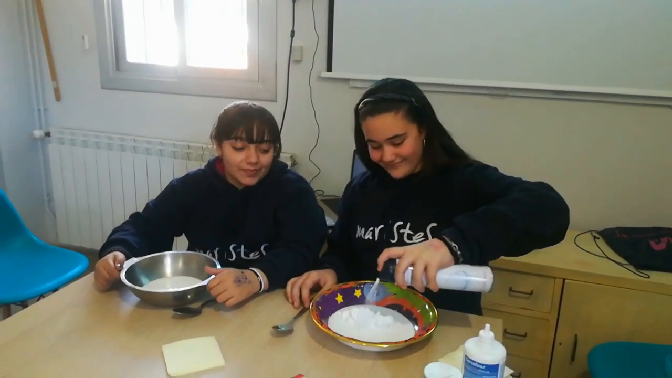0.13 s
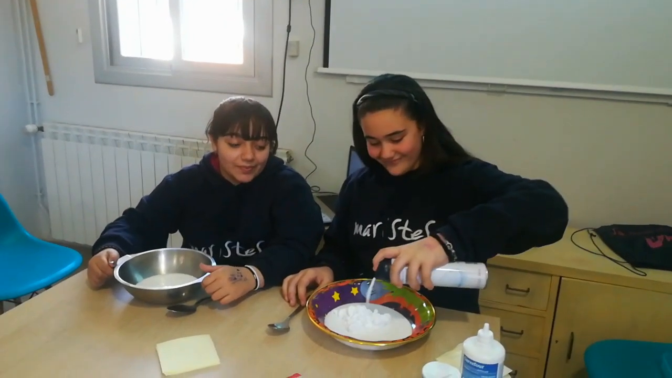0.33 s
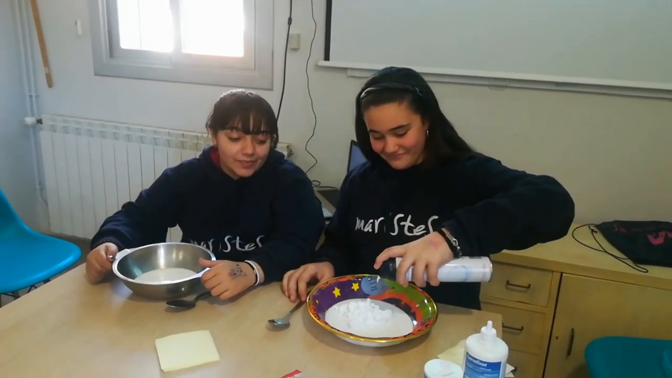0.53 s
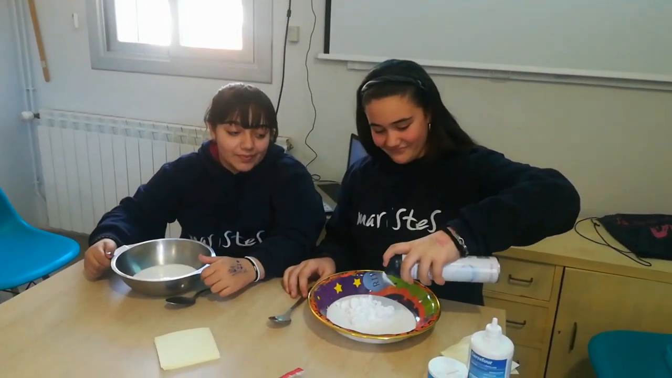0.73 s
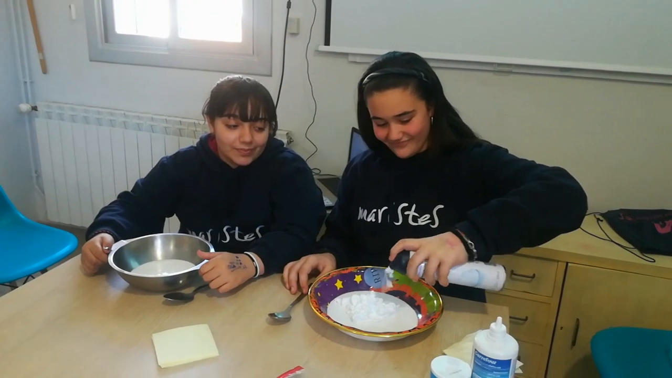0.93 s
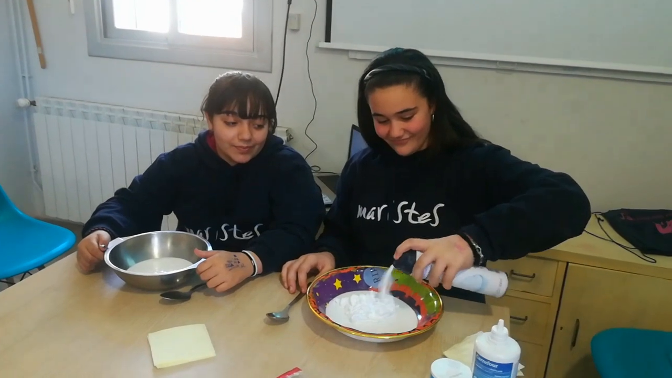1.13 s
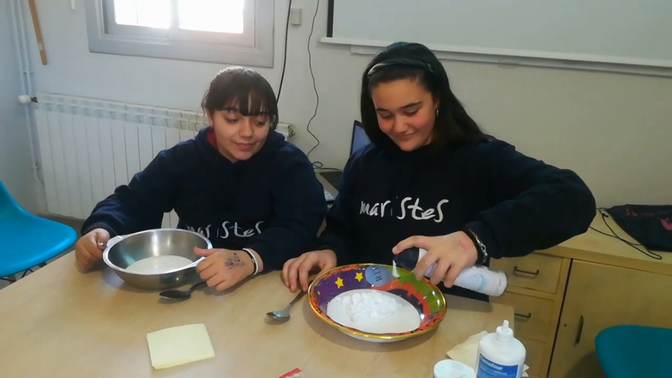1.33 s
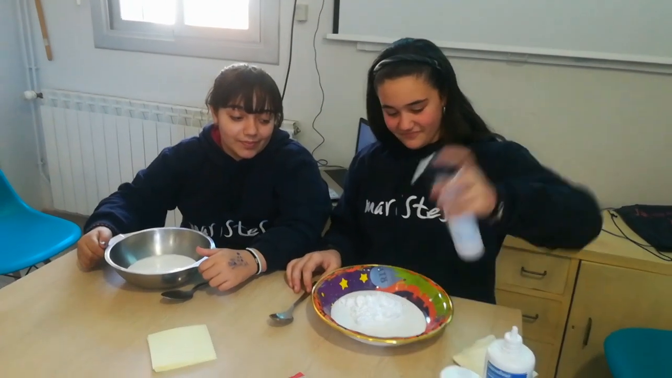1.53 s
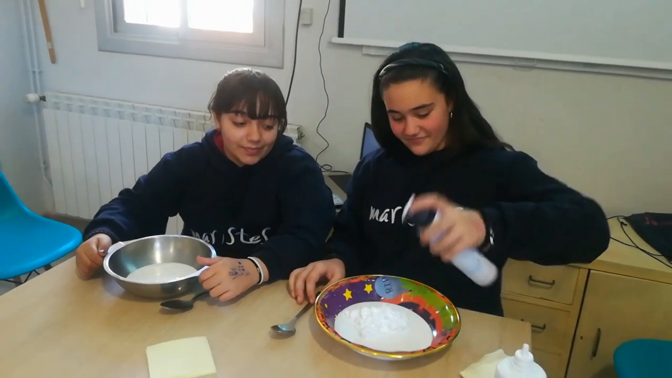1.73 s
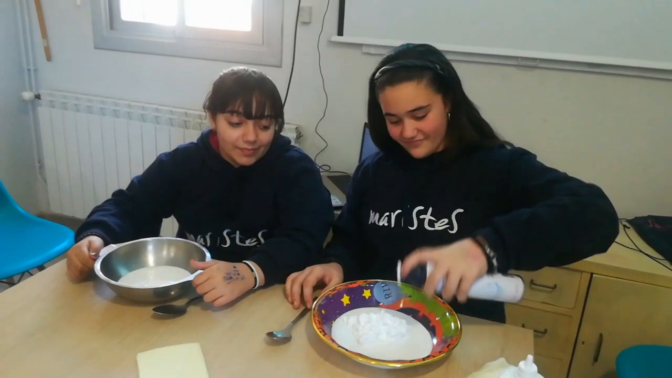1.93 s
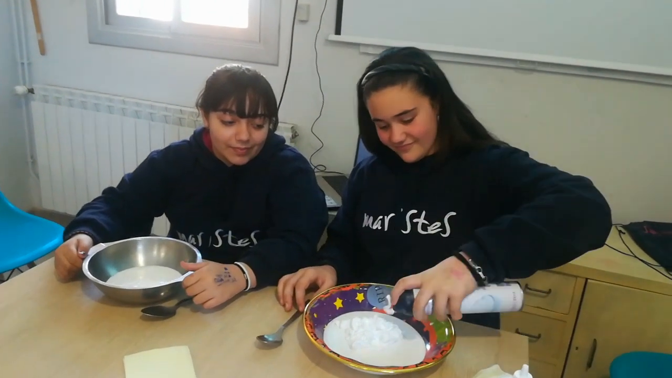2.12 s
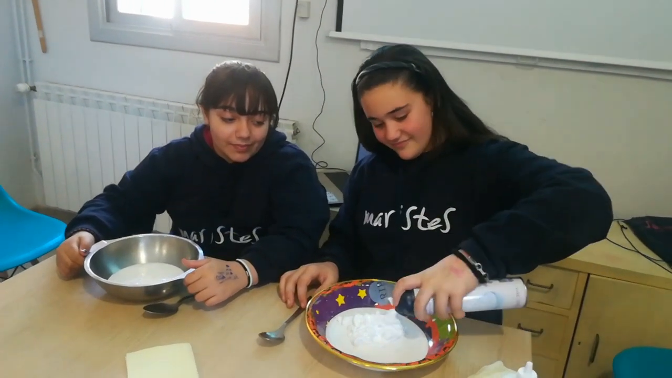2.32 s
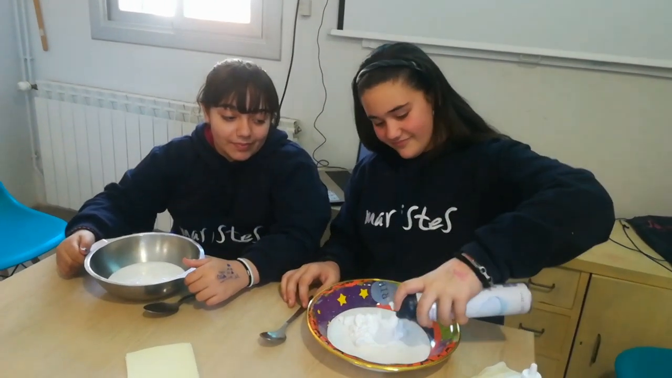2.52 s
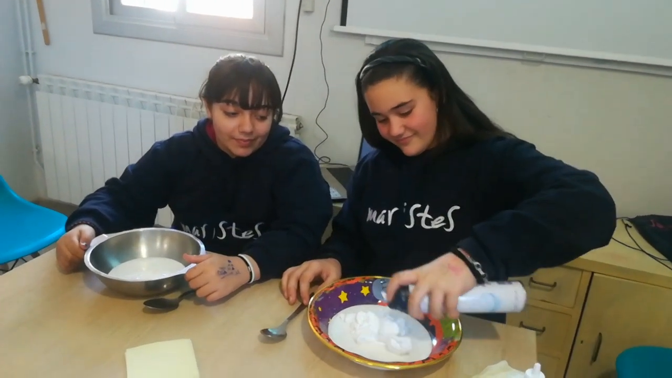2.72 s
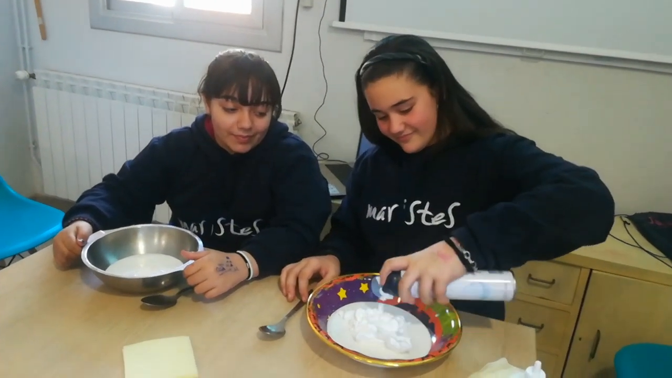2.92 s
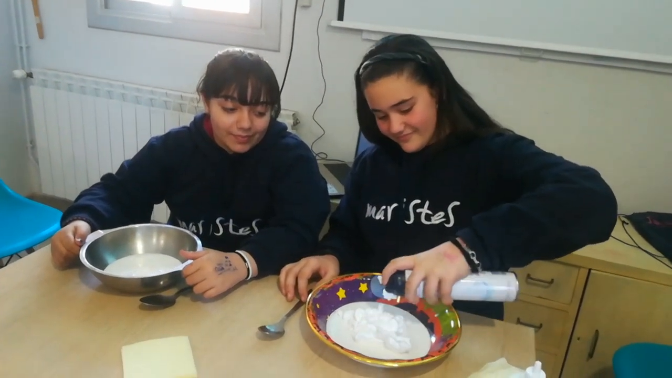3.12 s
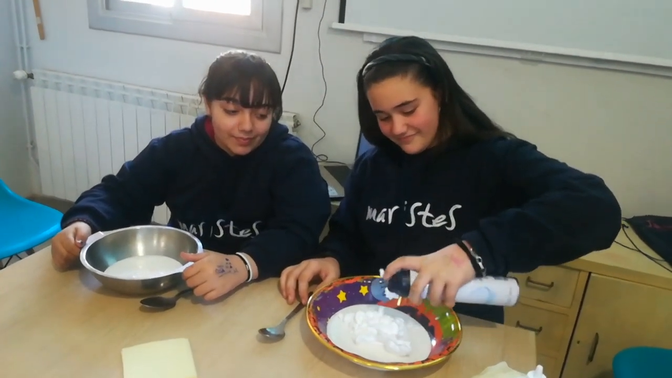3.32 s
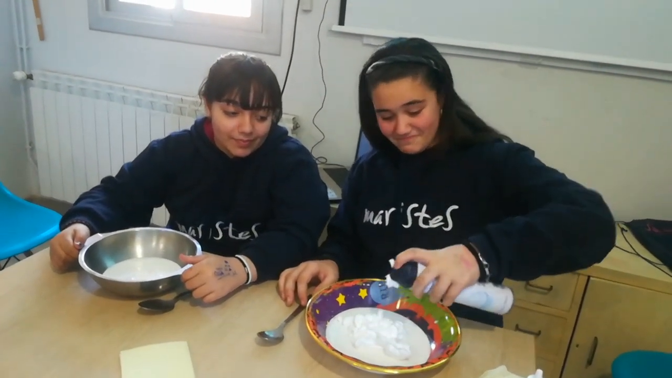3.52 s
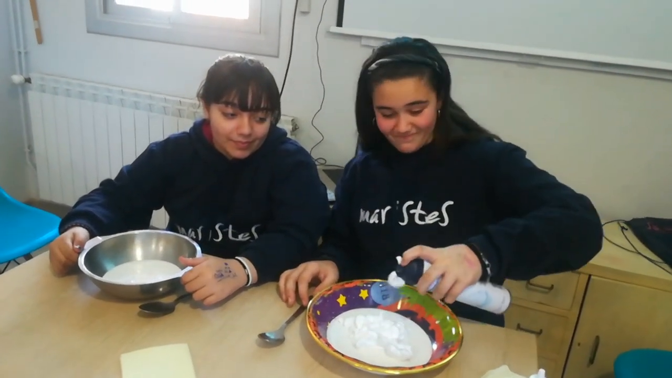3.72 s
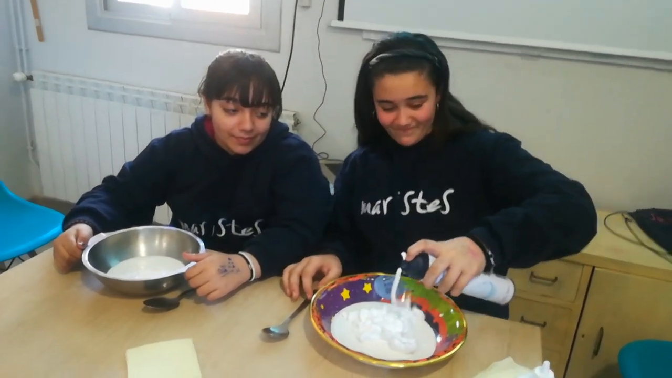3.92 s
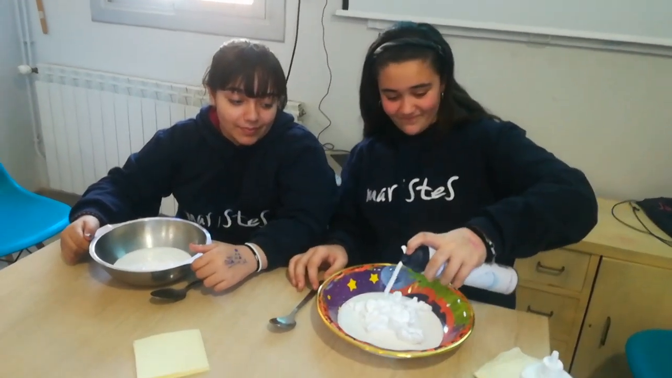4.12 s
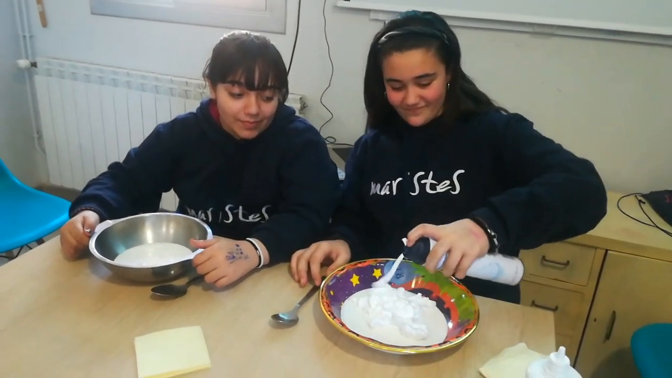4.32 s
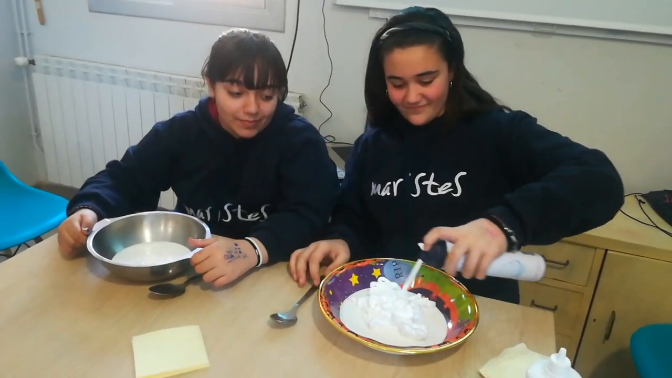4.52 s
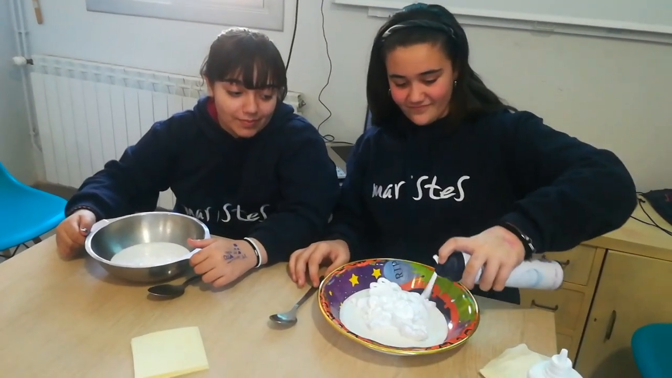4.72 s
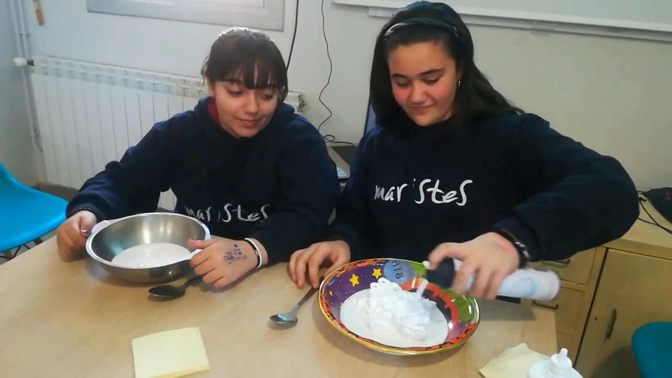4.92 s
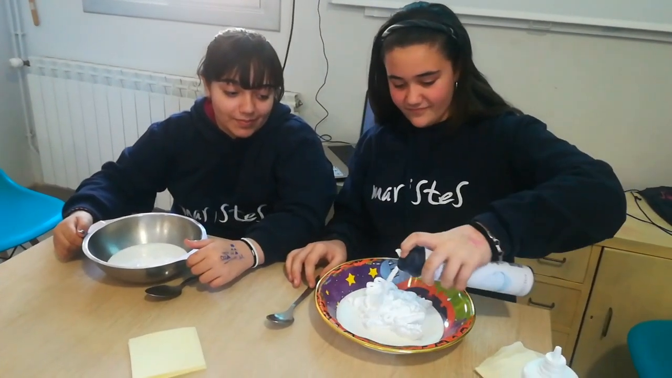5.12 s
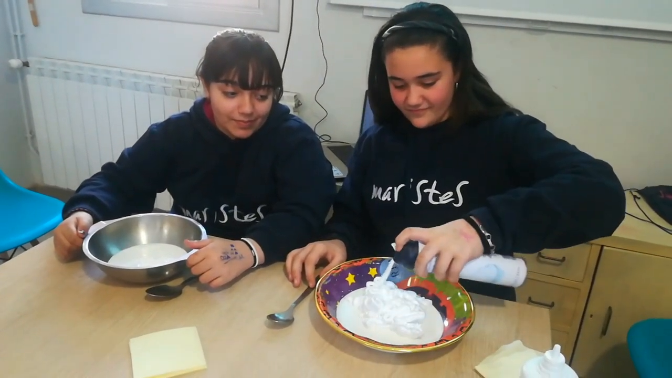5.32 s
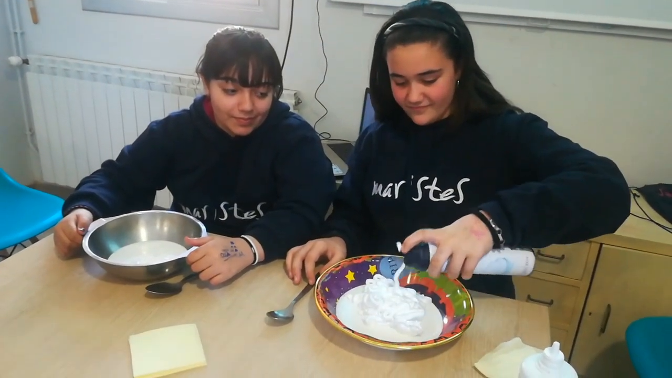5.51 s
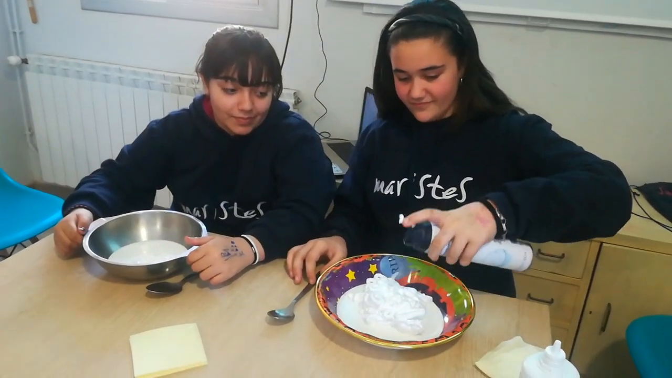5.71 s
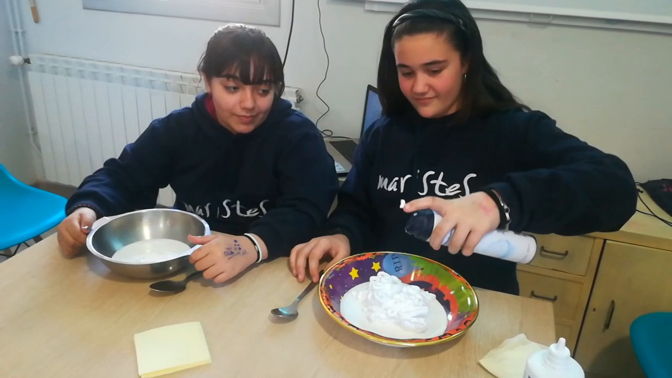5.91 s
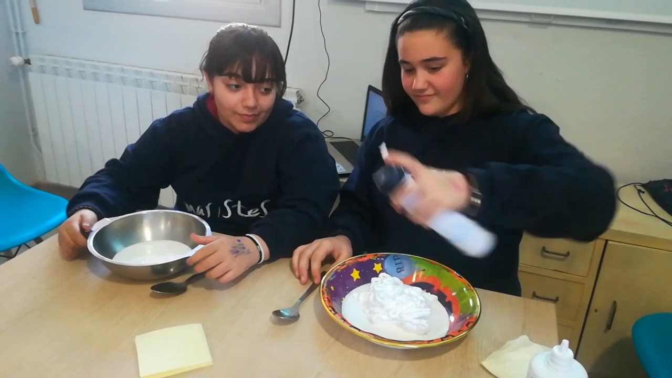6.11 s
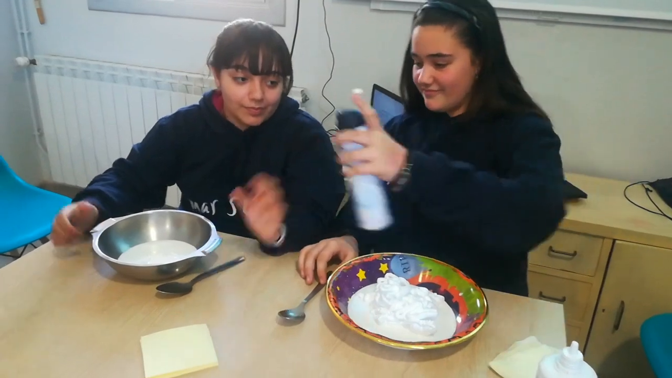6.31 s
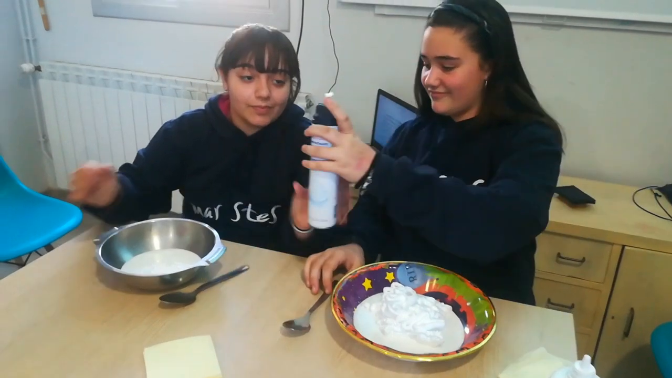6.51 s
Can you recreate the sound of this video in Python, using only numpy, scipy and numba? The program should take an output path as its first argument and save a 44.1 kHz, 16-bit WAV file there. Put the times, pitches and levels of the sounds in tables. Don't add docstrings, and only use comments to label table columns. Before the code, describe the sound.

An aerosol can sprays foam in short hissing, spitting bursts in a quiet hard-walled room, then a wooden table gets knocked.

```python
import sys
import numpy as np
from scipy import signal
from scipy.fft import rfft, irfft, next_fast_len
from scipy.io import wavfile
from scipy.ndimage import uniform_filter1d, map_coordinates
from numba import njit

SR = 44100
rng = np.random.default_rng(int(sys.argv[2]) if len(sys.argv) > 2 else 0)


def linear_from_db(decibels):
    return 10 ** (np.asarray(decibels, float) / 20)


def dump_mix(stems):
    frames = np.atleast_2d(stems).T
    limited = np.clip(frames, -1, 1)
    pcm = np.round(limited * 32767).astype(np.int16)
    wavfile.write(sys.argv[1], SR, pcm)


N = 289281

# pitch_hz, level_db
JET_COLOUR = [(1200, -19.5), (1900, -7), (2450, -2.5), (3100, 0), (4200, 0), (5200, -4.5), (6600, -2.5),
              (7800, -5), (9500, -21)]
# pitch_hz, level_db
GURGLE_COLOUR = [(120, -11.5), (250, -4.5), (600, -4), (1200, -1.5), (1900, -0.5), (2600, -20.5)]
# pitch_hz, level_db
AIR_COLOUR = [(6500, -19), (8000, 0.5), (10000, -3.5), (13000, -9.5), (16000, -17)]
# pitch_hz, level_db, fade_by_60_db_s
TABLE_NOTES = [(163, -2.5, 0.52), (269.6, -5, 0.78), (336, 0, 0.44), (364, -5.5, 0.65), (400, -28, 0.35),
               (519, -14, 0.14)]


def unit(x):
    return x / np.sqrt(np.mean(x ** 2, axis=-1, keepdims=True))


def colour(x, points):
    hz, db = np.transpose(points)
    size = next_fast_len(x.shape[-1])
    bins_hz = np.arange(1, size // 2 + 2) * SR / size
    gain_db = np.interp(np.log(bins_hz), np.log(hz), db)
    return irfft(rfft(x, size) * linear_from_db(gain_db), size)[..., :x.shape[-1]]


def hiss(points):
    return unit(colour(rng.standard_normal(N), points))


def walk(rate_hz):
    hold = int(SR / rate_hz)
    steps = np.repeat(rng.standard_normal(N // hold + 1), hold)
    smooth = uniform_filter1d(uniform_filter1d(steps, hold), hold)
    return 1.27 * smooth[:N]


@njit
def svf(x, hz, width):
    y, band, low = np.empty(len(x)), 0., 0.
    for i in range(len(x)):
        g = np.tan(np.pi * hz[i] / SR)
        k = width / hz[i]
        v = (band + g * (x[i] - low)) / (1 + g * (g + k))
        low = low + 2 * g * v
        band = 2 * v - band
        y[i] = k * v
    return y


def throat(gas, hz, width_hz):
    return unit(svf(svf(gas, hz, width_hz), hz, width_hz))


def gesture(rows, swell_s, swell_db, bend, open_s, shut_s):
    start_s, length_s, level_db, sag_db = np.transpose(rows)[:4, :, None]
    since = np.arange(N) / SR - start_s
    rising = np.clip(1 - since / swell_s, 0, 1)
    late = np.clip((since - swell_s) / np.maximum(length_s - swell_s, .01), 0, 1)
    gate = np.clip(np.minimum(since / open_s, (length_s - since) / shut_s + 1), 0, 1)
    level = linear_from_db(level_db - swell_db * rising ** 2 - sag_db * late ** bend)
    return (gate * level) ** 2, np.clip(since / length_s, 0, 1)


def valve():
    # start_s, length_s, level_db, sag_db, throat_hz
    presses = [
        (-0.09, 0.2, -26, 17, 5620),
        (0.245, 0.2, -26, 12.5, 5600),
        (0.733, 0.46, -27.5, 19.5, 5850),
        (2.592, 0.48, -28, 0.5, 5600),
        (3.645, 0.21, -32.5, 20.5, 5250),
    ]
    # start_s, length_s, level_db, sag_db, throat_hz
    easings = [
        (1.3, 0.25, -60.5, 31, 7400),
        (2.16, 0.54, -45, 9.5, 5900),
        (0.62, 0.1, -52.5, 0.1, 6400),
    ]
    # start_s, length_s, level_db, sag_db, throat_hz
    dribbles = [(0.11, 0.29, -42, 4.5, 5350), (3.25, 0.37, -61, 14.5, 5600),
                (3.619, 0.015, -59.5, -4, 5100), (3.84, 0.2, -43.5, 1, 5350), (4.04, 0.23, -46, 11, 5600),
                (4.228, 0.1, -53, 3, 5600), (4.3, 0.98, -56.5, 3.5, 5950), (5.215, 0.25, -56, 2.5, 6900),
                (5.705, 0.18, -44.5, 21.5, 5580), (5.958, 0.16, -57, 18.5, 6450),
                (6.48, 0.051, -62.5, 11, 6870), (6.53, 0.05, -59.5, 3, 6870)]
    kinds = [(presses, 0.075, 4, 2.62), (easings, 0.23, 26, 0.57), (dribbles, 0.008, -3, 1.1)]
    power, pitch = 1e-12, 1e-12 * 5800
    for rows, swell_s, swell_db, bend in kinds:
        p, through = gesture(rows, swell_s, swell_db, bend, open_s=0.0022, shut_s=0.016)
        hz = np.array(rows)[:, -1:] * (1 - 0.05 * (through - .5))
        power = power + p.sum(axis=0)
        pitch = pitch + (p * hz).sum(axis=0)
    return np.sqrt(power), pitch / power


def jet():
    # jet_db, gurgle_db, air_db, low_throat_hz, upper_part_db
    flow = [(-65.5, -4.5, -16, 1200, -5.5), (-72.5, -11, -3, 4000, 2.5), (-40, -6.5, -16.5, 2730, -3),
            (-43, -10, -18, 3000, -3), (-23, -16, -11.5, 3450, -2)]
    # time_s, extra_gurgle_db, extra_upper_db
    foam = [(0.0, 0, 0.5), (0.3, -0.5, 1), (0.74, -2.5, 0.5), (1.0, -3.5, 0.5), (1.5, -3.5, -0.5),
            (2.4, -4, 0.5), (2.62, 5, -0.5), (2.8, 0, 0), (3.05, 0, 1), (3.67, -3.5, 4), (3.76, 0.5, -3),
            (4.1, -1, 0), (4.8, -0.5, -1), (5.3, 0.5, 6), (5.8, -1.5, -2.5)]
    gain, high_hz = valve()
    gain_db = 20 * np.log10(gain)
    flow_db, *colours = np.transpose(flow)
    gurgle_db, air_db, low_hz, high_db = (np.interp(gain_db, flow_db, c) for c in colours)
    foam_s, wet_db, upper_db = np.transpose(foam)
    t = np.arange(N) / SR
    gurgle_db = gurgle_db + np.interp(t, foam_s, wet_db)
    high_db = high_db + np.interp(t, foam_s, upper_db)
    tearing = linear_from_db(2.7 * walk(1500) + 0.64 * walk(200))
    gas = hiss(JET_COLOUR)
    share = np.clip(1.09 * linear_from_db(2 * high_db), .05, .95)
    low = throat(gas, low_hz * (1 + 0.045 * walk(20)), 1200.0)
    low = low * linear_from_db(2.5 * walk(40)) * (1 - share)
    high = throat(gas, high_hz * (1 + 0.04 * walk(20)), 1700.0)
    high = high * linear_from_db(2.0 * walk(40)) * share
    cap = unit(svf(gas, 2005.0 * (1 + 0.032 * walk(7.3)), 310.0))
    cap = linear_from_db(-16 + 4.3 * walk(8.2)) * cap
    throats = linear_from_db(-0.5 + 0.15 * (gain_db + 32)) * (low + high)
    body = linear_from_db(-2.5) * hiss(JET_COLOUR) + throats + cap
    gurgle = linear_from_db(gurgle_db + 2.0 * walk(30.08)) * hiss(GURGLE_COLOUR)
    air = linear_from_db(air_db) * hiss(AIR_COLOUR)
    return gain * unit(tearing) * (body + gurgle + air)


def spits():
    # time_s, peak_db, pitch_hz
    plugs = [(0.061, -22.5, 5270), (0.095, -16.5, 6000), (0.14, -28, 4660), (0.162, -28, 4500),
             (0.176, -17, 5230), (0.205, -20, 2980), (0.2484, -13.5, 4920), (0.2726, -21.5, 5970),
             (0.789, -22, 5850), (0.8643, -13.5, 5800), (0.999, -20.5, 3220), (1.0931, -18, 4930),
             (1.1164, -18, 5800), (1.1482, -23, 3100), (2.2378, -38, 6460), (2.5936, -17, 3080),
             (2.9008, -15, 6740), (2.9215, -20.5, 5160), (3.1048, -23, 4700), (3.6233, -43, 2980),
             (3.6505, -30.5, 3320), (3.7122, -14.5, 5060), (3.749, -14, 3070), (3.8178, -21, 5540),
             (3.8537, -21.5, 2630), (3.955, -31.5, 3530), (3.995, -30, 5160), (4.2386, -42, 3830),
             (5.9623, -41.5, 7800), (6.5338, -41.5, 6940)]
    # time_s, peak_db, pitch_hz
    pops = [(0.047, -21, 5670), (0.1287, -24.5, 4280), (0.2528, -26, 5860), (0.31, -31, 3140),
            (2.172, -51, 6240), (2.2023, -48, 4960), (2.218, -45, 4900), (3.095, -13, 5200),
            (3.642, -35, 3200), (3.771, -26, 3250), (3.908, -36, 3550), (4.2326, -44, 3940),
            (4.2514, -53, 3790), (4.27, -50, 5500)]
    puff_ms = 1.75
    out, t = np.zeros(N), np.arange(2048) / SR
    broad = hiss(JET_COLOUR) + linear_from_db(-10) * hiss(AIR_COLOUR) + linear_from_db(-9.5) * hiss(GURGLE_COLOUR)
    for time_s, peak_db, hz in list(plugs) + list(pops):
        i = int((time_s - .001) * SR)
        gas = broad[i:i + len(t)]
        x = t[:len(gas)] * 1000 / puff_ms
        bright = svf(gas, np.full(len(gas), 1. * hz), 1200.)
        puff = x * np.exp(1 - x) * (.6 * gas + 1.8 * bright)
        out[i:i + len(t)] += linear_from_db(peak_db + 2.0) * puff / np.abs(puff).max()
    return out


def plate(x):
    return x - 0.4 * svf(x, np.full(N, 2680.), 300.)


def ports(x, lag):
    # pitch_hz, left_minus_right_db
    lean = [(100, 12), (700, 3.5), (2400, 4), (5000, 14), (15000, 3)]
    left, right = (colour(x, [(hz, side * db / 2) for hz, db in lean]) for side in (1, -1))
    return np.array([map_coordinates(left, [np.arange(N) - lag], order=3), right])


def echoes():
    # pitch_hz, fade_by_60_db_s
    room_fade = [(150, 0.47), (600, 0.46), (2000, 0.49), (5000, 0.4), (12000, 0.36)]
    fade_hz, fade_s = np.transpose(room_fade)
    t, tail = np.arange(32768) / SR, 0
    apart = np.array([[1], [-1]])
    for hz in 63 * 2 ** np.arange(9.):
        t60 = np.interp(np.log(hz), np.log(fade_hz), fade_s)
        octave = [(hz / 2, -60), (hz / 1.45, -6), (hz / 1.3, 0),
                  (hz * 1.3, 0), (hz * 1.45, -6), (hz * 2, -60)]
        mid, side = unit(colour(rng.standard_normal((2, len(t))), octave))
        wide = np.clip(hz / 490.0, 0, 1)
        both = mid + wide * side * apart
        tail = tail + np.sqrt(hz) * both * np.exp(-np.log(1000) * t / t60)
    walls = np.clip((t - .003) / 0.0089, 0, 1)
    tail = tail * (walls + 1.56 * np.exp(-t / 0.0076))
    return tail / np.sqrt(np.sum(tail ** 2, axis=1, keepdims=True))


def room(x):
    turn = 2.07 * walk(4)
    parts = [x * np.cos(turn), x * np.sin(turn)]
    return sum(signal.fftconvolve(part[None], echoes(), axes=1)[:, :N] for part in parts)


def background():
    # pitch_hz, level_db
    quiet = [(15, -29.5), (25, -1), (40, -6.5), (55, -4.5), (77, -14.5), (228, -22.5), (542, -31),
             (900, -28.5), (1400, -32), (2350, -38), (6720, -40), (9000, -46), (16000, -63)]
    # pitch_hz, level_db, phase_wander_rad
    fan = [(46, -68, 1.8), (926, -77.5, 0.72), (1156, -74, .6), (1820, -84, .7)]
    mid, side = (linear_from_db(0.5 * walk(2.3)) * colour(rng.standard_normal(N), quiet) for _ in range(2))
    side = colour(side, [(60, -22.5), (250, -5.5), (600, 1.0)])
    noise = mid + side * np.array([[1], [-1]])
    noise = linear_from_db(-60.5) * noise / np.sqrt(np.mean(mid ** 2))
    t, lines = np.arange(N) / SR, 0
    for hz, db, wander_rad in fan:
        level = linear_from_db(db + 3 - .7 * t + 1.5 * walk(5))
        lines = lines + level * np.sin(2 * np.pi * hz * t + wander_rad * walk(9))
    return noise + lines


def ring(x, modes):
    out = 0
    for hz, db, t60 in modes:
        pole = np.exp((2j * np.pi * hz - np.log(1000) / t60) / SR)
        out = out + linear_from_db(db) / np.sqrt(t60) * signal.lfilter([1], [1, -pole], x).imag
    return out


def damped_notes():
    return [(hz, db, 0.28 * t60) for hz, db, t60 in TABLE_NOTES]


def knocks():
    # time_s, blow_db, crack_db, contact_ms
    blows = [
        (2.627, -36, -30, 17),
        (6.13, -54.5, -30, 25),
        (4.78, -34, -13, 22),
        (5.14, -47, -21, 45),
        (5.497, -33.5, 1.5, 4.7),
        (5.505, -19.5, -9, 12.8),
        (5.511, -15.5, 2, 9),
        (5.542, -16.5, -5.5, 23.2),
    ]
    # pitch_hz, level_db
    thud_colour = [(60, -49), (150, -34), (240, -8), (374, 4), (503, -15), (754, -6), (1010, -8),
                   (1700, -14), (2500, -18), (3400, -20), (5500, -90)]
    # pitch_hz, level_db
    crack_colour = [(1180, -46), (2000, -34), (2640, -6.5), (3310, -0.5), (4410, -2), (6470, -7.5),
                    (7980, -20), (16000, -32)]
    t = np.arange(N) / SR
    push, snap = np.zeros(N), np.zeros(N)
    for time_s, blow_db, crack_db, contact_ms in blows:
        x = np.clip(t - time_s, 0, 1) * 1000 / max(contact_ms, 1)
        shape = linear_from_db(blow_db) * np.sqrt(x) * np.exp(-x)
        push = push + shape
        snap = snap + linear_from_db(crack_db) * shape
    ringing = linear_from_db(-36) * ring(push * rng.standard_normal(N), damped_notes())
    ringing = signal.sosfilt(signal.butter(3, 150., "high", fs=SR, output="sos"), ringing)
    thud = linear_from_db(16.5) * colour(push * rng.standard_normal(N), thud_colour)
    return ringing + thud + snap * hiss(crack_colour)


def sleeve():
    # start_s, length_s, level_db, sag_db
    strokes = [
        (5.23, 0.084, -80.5, 9),
        (6.27, 0.21, -57.5, 29),
    ]
    # pitch_hz, level_db
    cloth = [(400, -12.5), (800, -7), (1400, 4), (2000, -9.5), (4000, -10.5), (8000, -26.5)]
    power = gesture(strokes, 0.012, 18, 1.2, open_s=0.0073, shut_s=.03)[0].sum(axis=0)
    return np.sqrt(power) * linear_from_db(2.0 * walk(60)) * hiss(cloth)


def creak():
    # start_s, length_s, level_db, sag_db
    leaning = [
        (5.35, 0.13, -55.5, -8),
    ]
    groan = unit(ring(rng.standard_normal(N), damped_notes()[1:2]))
    power = gesture(leaning, 0.026, 16, 2.5, open_s=0.01, shut_s=0.02)[0].sum(axis=0)
    return groan * np.sqrt(power)


def scene():
    can = plate(jet() + spits())
    wood = knocks() + sleeve() + creak()
    direct = linear_from_db(-4.0) * ports(can, 1.9 + 1.14 * walk(5)) + linear_from_db(-5) * wood
    return direct + room(linear_from_db(-3) * can + linear_from_db(-0.5) * wood) + background()


def top_cut(x):
    return signal.sosfilt(signal.butter(12, 16800, fs=SR, output="sos"), x)


def record(dry):
    low_pass = signal.ellip(10, .2, 70, 15850, fs=SR, output="sos")
    return top_cut(signal.sosfilt(low_pass, dry))


dry = scene()
out = record(dry)
dump_mix(out)
```